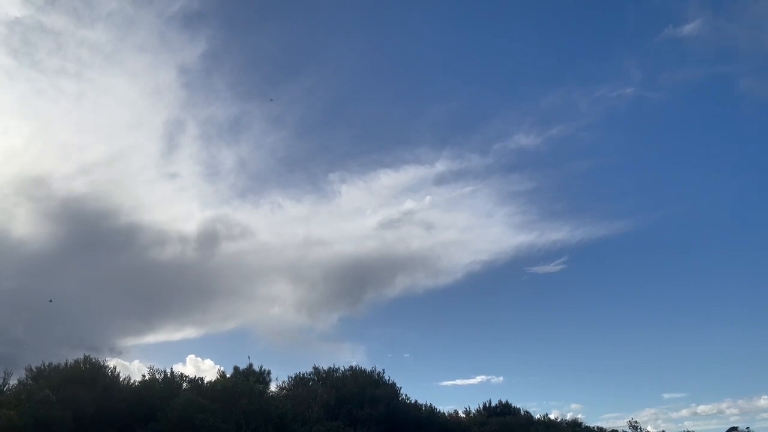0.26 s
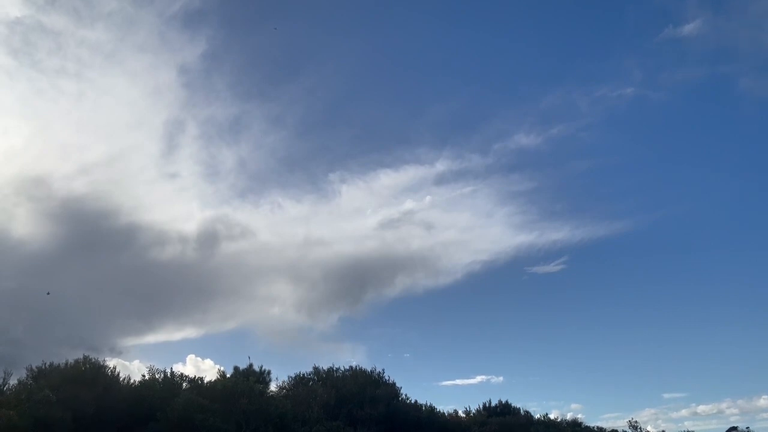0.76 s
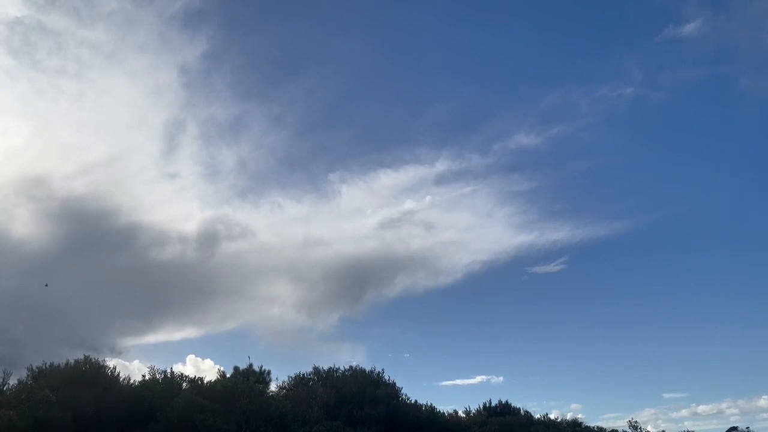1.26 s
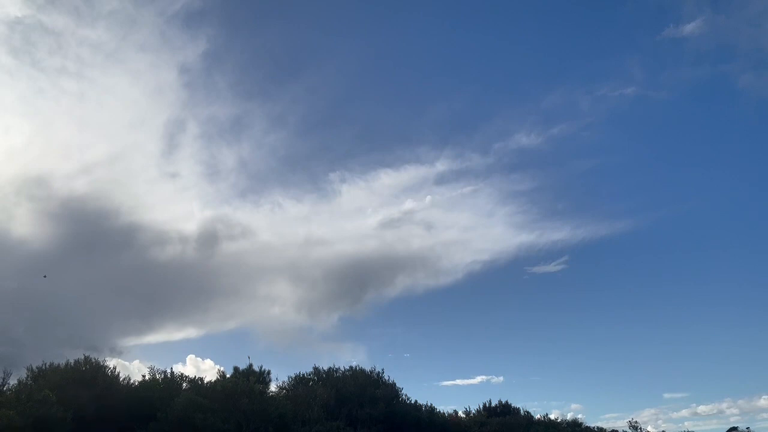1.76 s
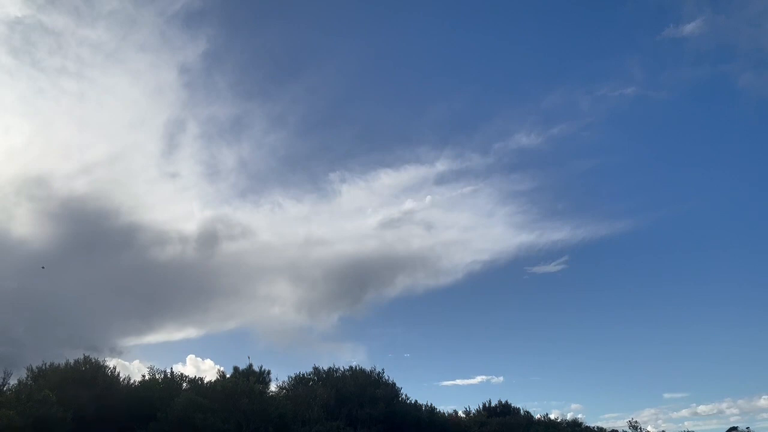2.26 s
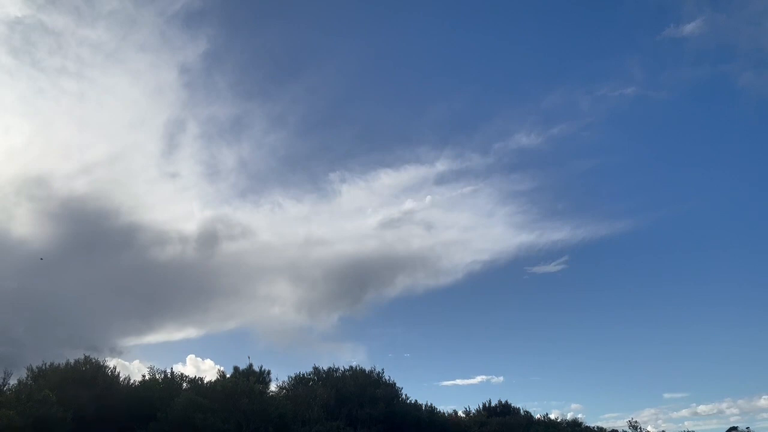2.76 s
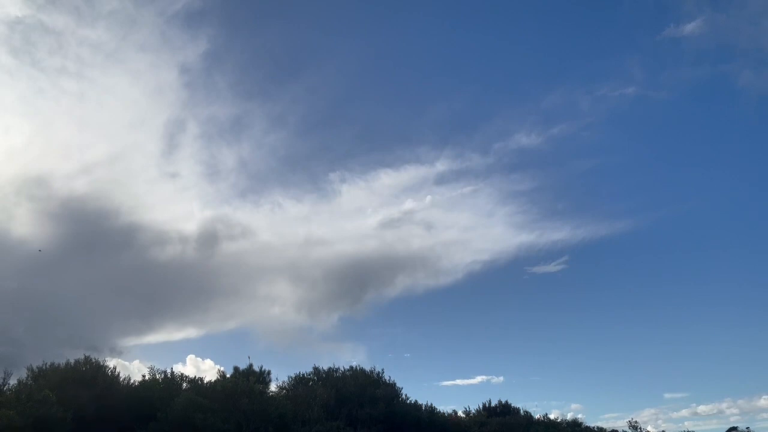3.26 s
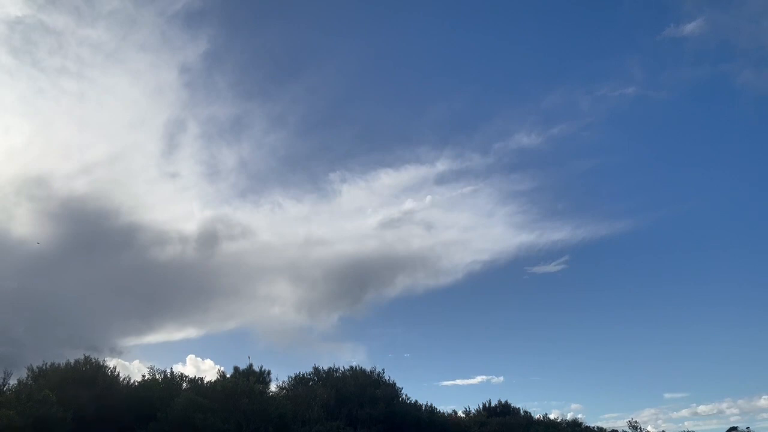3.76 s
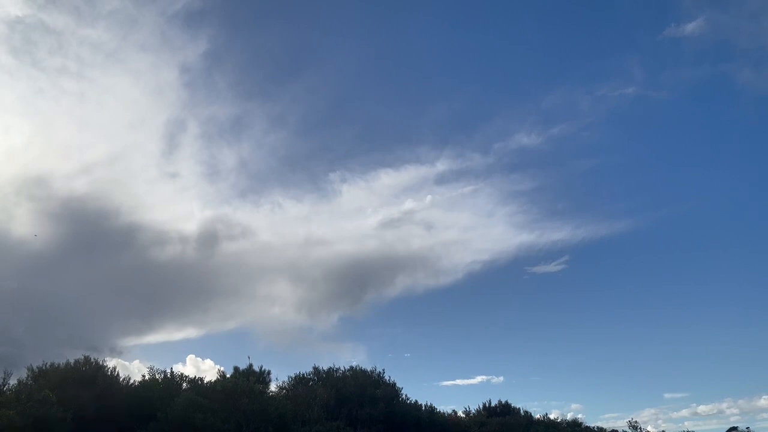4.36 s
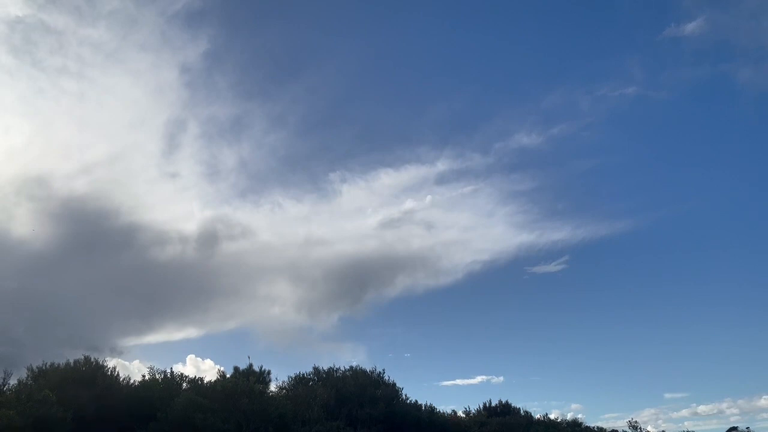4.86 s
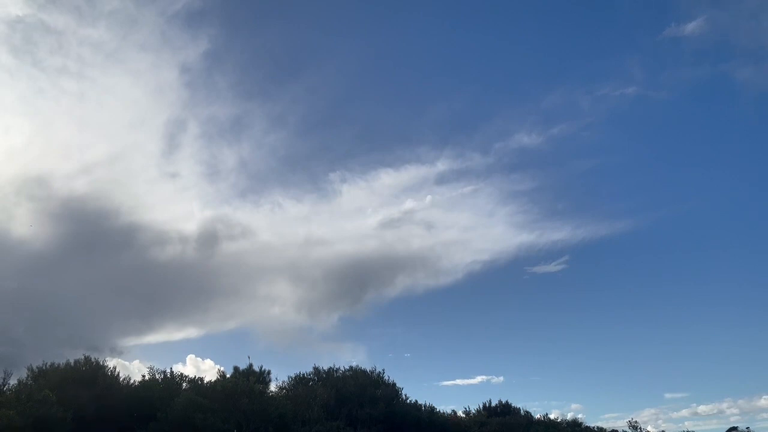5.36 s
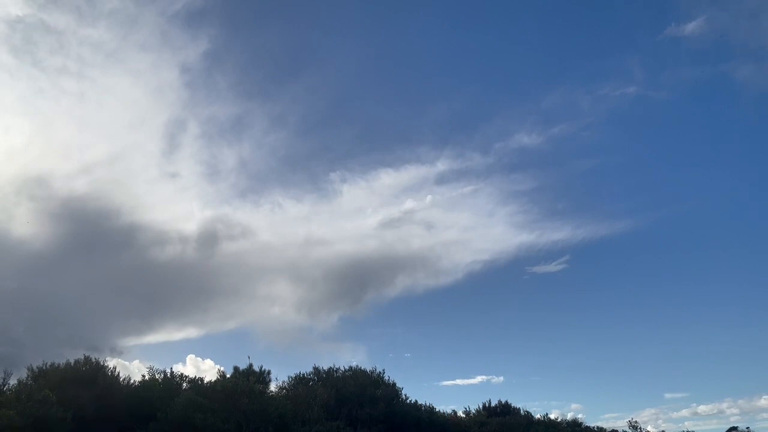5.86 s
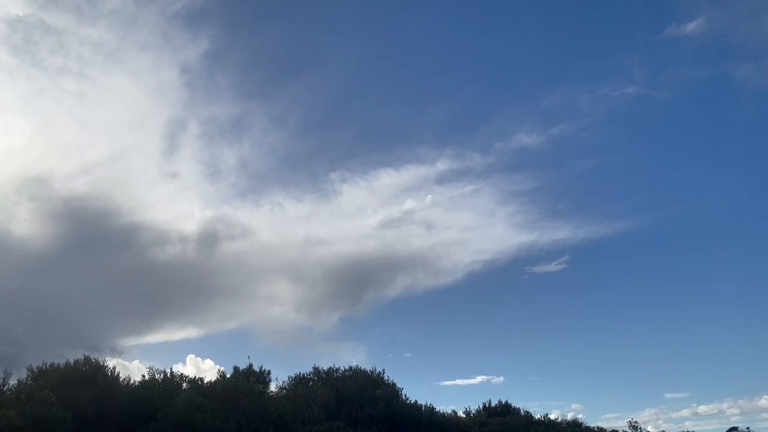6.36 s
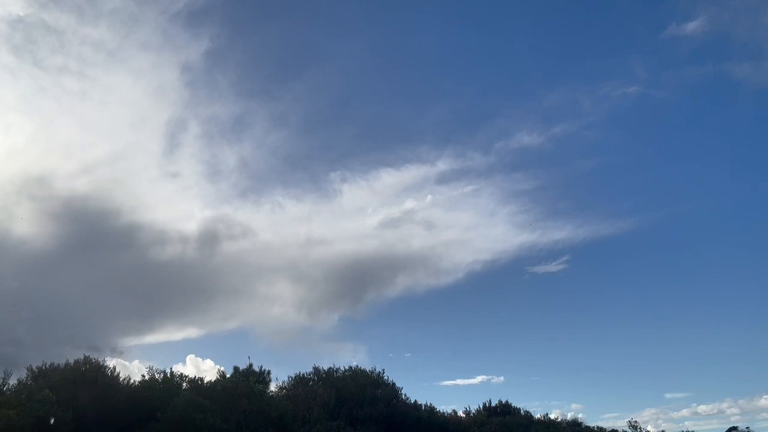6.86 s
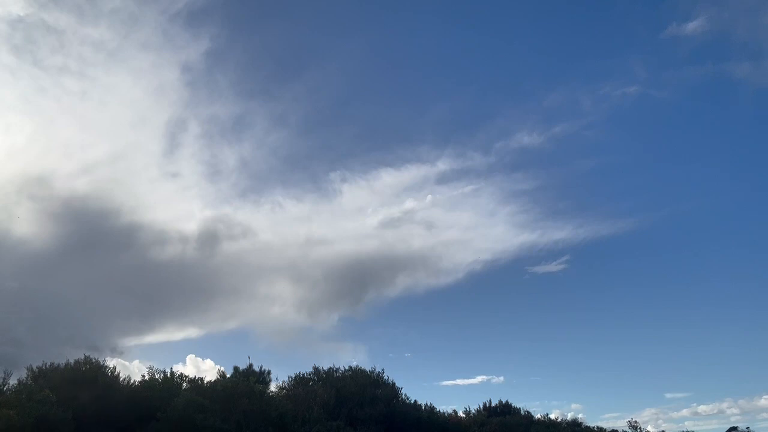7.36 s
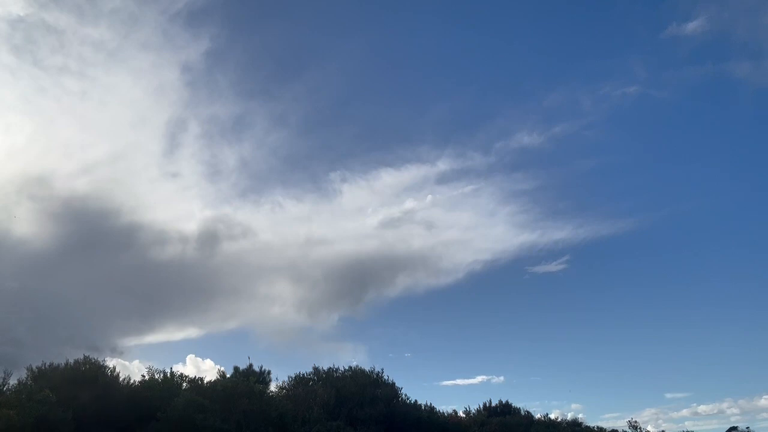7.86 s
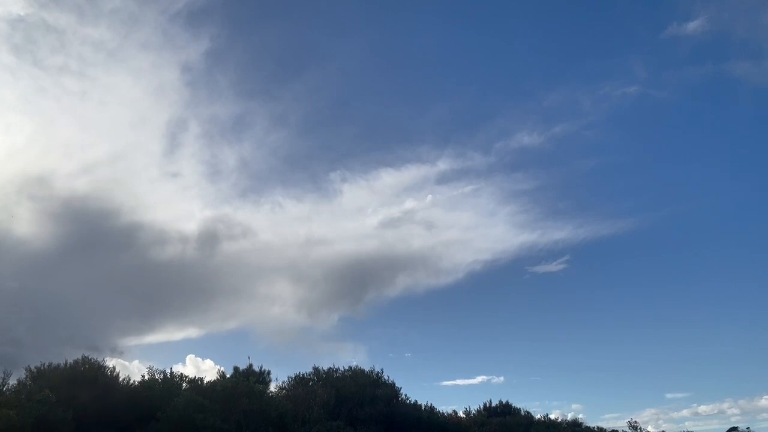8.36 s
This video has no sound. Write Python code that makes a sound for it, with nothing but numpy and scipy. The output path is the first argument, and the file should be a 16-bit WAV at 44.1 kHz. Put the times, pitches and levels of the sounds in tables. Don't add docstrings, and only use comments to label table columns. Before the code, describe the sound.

Open countryside, a jet far off in the sky, heard slightly left through a small camera's close stereo microphones. At 0 s a moderately loud, deep turbulent roar is already under way, with a few dry crackles; it lifts briefly around 0.6 s, then recedes, fluttering irregularly as the air shifts. Brief brighter patches come near 1.6 and 2 s. From 2.5 to 4 s it sinks into a soft, dull rumble, quietest about 3.8 s, with faint hiss. Tiny high chirps at 1.4 and 4.2 s are almost buried. From 4.5 s the roar swells again, thickening by 6 s with rasp and scattered crackle, and is powerful by 7 s. Around 7.8-8.1 s it is harshest and brightest, a tearing burst of sharp, dense pops over heavy rumble. It then dulls, still loud and rumbling, easing slightly until 8.6 s. Short ground and wall reflections make it faintly hollow.

```python
import sys
import numpy as np
from scipy import signal
from scipy.fft import rfft, irfft, next_fast_len
from scipy.io import wavfile
from scipy.ndimage import uniform_filter1d, map_coordinates

SR = 44100
rng = np.random.default_rng(int(sys.argv[2]) if len(sys.argv) > 2 else 0)


def ratio_of_db(decibels):
    return 10 ** (np.asarray(decibels, float) / 20)


def store_wav(level_fs):
    pcm = np.round(np.clip(np.atleast_2d(level_fs), -1, 1) * 32767)
    wavfile.write(sys.argv[1], SR, pcm.T.astype(np.int16))


N = 380132

BAND_HZ = [110, 400, 1150, 3800]
# f/Hz, density/dB per Hz
EXHAUST_COLOUR = [(24, -59.5), (38, -38.5), (50, -25.5), (75, -19), (150, -21), (300, -25.5), (600, -27),
                  (1150, -32), (1550, -25.5), (2500, -27.5), (4000, -38.5), (6000, -42), (9000, -56),
                  (12500, -74), (15000, -83.5)]
# t/s, level/dB, side-on share over rear rumble/dB, clarity of the air/dB
FLIGHT_PATH = [(0.0, -20, -5, -31), (0.2, -19.5, -6.5, -35.5), (0.6, -18.5, -10.5, -38.5),
               (1.0, -21, -11.5, -37.5), (1.4, -23.5, -11, -42), (1.9, -26, -12, -38.5),
               (2.6, -27.5, -4.5, -38.5), (3.2, -32.5, -9, -43), (3.8, -36, -8.5, -42.5),
               (4.4, -34.5, -7, -39.5), (5.1, -27.5, -1, -36), (5.7, -23.5, -1.5, -35.5),
               (6.3, -17.5, -3.5, -33), (7.0, -14, -8.5, -39), (7.6, -14, -6.0, -32), (8.0, -15, -2.5, -29),
               (8.3, -13, -10, -34.5), (8.6, -16.5, -12.5, -41)]
# t/s, lift/dB, half length/s
STILL_POCKETS = [(0.076, 2, .08), (0.498, 1.5, .1), (0.916, 2.5, .08), (1.607, 5.5, .11), (2.013, 5, .07),
                 (2.367, 3.5, .06), (2.556, 2.5, .08), (5.228, 2, .1), (5.459, 2.5, .05), (6.005, 3.5, .05),
                 (6.41, -0.5, 0.077), (6.609, 2.5, 0.03), (6.77, 2.5, .05), (7.298, 1, 0.059),
                 (7.46, -1, 0.09), (7.858, 3, .06), (8.041, 4.5, 0.057), (8.154, 3.5, 0.046),
                 (8.287, 0, 0.044), (8.36, 0, 0.045)]
POCKET_REACH = [0.048, .15, .8, 1.05]
# t/s, f/Hz, gain/dB, half length/s
EDDIES = [(0.2, 740, -2.5, .3), (0.41, 200, 4, 0.73), (0.75, 400, -8.5, 0.34), (1.7, 380, 8, .2),
          (2.23, 1130, -3.5, 0.7), (3, 160, 1.5, 0.64), (4.8, 1300, 1, .2), (8.7, 230, -4.5, .2),
          (3.2, 1100, -4, 0.85), (4.1, 575, 4.5, 0.46), (4.6, 180, 4, 0.32), (5.3, 450, -4, 0.32),
          (5.4, 200, -9, 0.34), (3.6, 970, -2, 0.096), (6.5, 1100, -4, 0.3), (6.1, 520, 4.5, 0.16),
          (7.35, 380, 0, .12), (7.35, 150, -4, .2), (6.1, 150, 6, 0.17), (5.3, 330, 1.5, 0.14),
          (6.9, 280, -5, .08), (5.9, 940, 1, .3), (6.6, 880, 6, .3), (7.45, 900, 4.5, .15),
          (4.3, 290, -3, 0.42), (8.08, 13000, 13, .14), (0.044, 12500, -14, .15), (6.5, 900, -2.5, .3),
          (6.2, 900, -3.5, .2), (1.62, 2400, -3.5, .1), (3.7, 170, -3.5, .2), (0.72, 430, -4.5, 0.14),
          (0.083, 480, 3, 0.17), (6.55, 190, 4.5, 0.14), (7, 150, 3.5, .15), (1.62, 6500, -4, .1),
          (7.5, 700, 2, 0.13), (6.7, 190, 6.5, 0.086), (7.25, 220, -7, 0.18),
          (6.8, 440, 0.5, 0.14), (7.2, 1000, 3.5, .2), (8.4, 640, -2, 0.18), (7.75, 370, 4.5, 0.17),
                (7.95, 1130, 9, .18), (8.12, 3700, 9, 0.092), (8.06, 7500, 3.5, 0.11),
                (.08, 6500, -9.5, .1), (0.59, 7400, 6, .3), (4.2, 1000, 7, 0.18), (8.3, 920, 2.5, 0.21),
                (7.95, 970, -4, 0.18), (3.8, 1200, -5.5, 0.12), (3.21, 1200, 6, .15), (3.2, 750, 3, 0.28),
                (6.2, 150, 3, 0.17), (4.8, 170, -5.5, .2), (1.5, 2400, 2, .1), (1.8, 1600, 3, .1),
                (5.3, 460, 6.5, 0.13), (8.1, 320, 4, 0.18), (7.9, 870, -1.5, 0.57), (7.47, 3500, 9.5, 0.25),
                (2.3, 3200, 3.5, .4), (.2, 3900, 5, .3)]
# f/Hz, width/octaves, level/dB
COMB_RIDGES = [(880, .09, 2.5), (706, 0.13, -2.5), (1660, 0.063, 1)]
# f/Hz, level/dB
SCATTER = [(60, -42), (250, -29), (700, -8), (2000, -8), (6000, 1.5), (9000, -6.5)]
# f/Hz, level/dB
MIC_HISS = [(4000, -1), (7000, -1.5), (9000, -4.5), (10500, -5.5), (13000, -2.5), (16000, -8)]
# f/Hz, width/Hz, level/dB
FIXED_RINGS = [(3870, 590, 2), (1134, 174, 5.5), (2500, 1300, -1.5), (847, 72, 0.5), (547, 75, -2),
               (815, 410, -1), (184.4, 45, 4), (1478, 270, -3), (2200, 100, 3.5), (763, 50, -0.5),
               (1520, 150, -1.5), (1740, 60, -1)]
# t/s, peak/dB, sharpness/dB
STRONG_FRONTS = [(0.0368, -26.5, -29.5), (0.0982, -27.5, -19.5), (0.1095, -29, -29.5), (2.1405, -36, -37),
                 (2.1705, -38.5, -32), (2.3486, -39, -28), (5.451, -35.5, -36), (5.7224, -33, -33),
                 (5.9768, -31.5, -23), (5.9953, -29, -25), (6.1898, -26.5, -28.5), (6.341, -25.5, -25),
                 (6.3809, -24, -27.5), (6.5959, -24, -24.5), (6.6049, -22.5, -28), (6.76, -23, -26),
                 (6.996, -29.5, -41), (7.3058, -21.5, -31), (7.7672, -23, -21), (7.8271, -20.5, -29.5),
                 (7.8745, -20.5, -14.5), (7.9455, -25, -12), (7.9497, -17.5, -2), (7.9676, -16, -3),
                 (7.9872, -11.5, -22.5), (8.0102, -14, -17), (8.0377, -17.5, -17.5), (8.0626, -13, -20),
                 (8.108, -16, -22.5), (8.317, -21, -25.5), (8.3619, -24.5, -36)]
# t/s, peak/dB
APPROACH_CRACKLES = [(5.659, -48), (5.7503, -45), (6.108, -41), (6.1724, -34), (6.2756, -35), (6.322, -31),
                     (6.3974, -33), (6.417, -33), (6.5527, -37), (6.4378, -31), (6.4867, -38),
                     (6.5161, -38), (6.5435, -38), (6.7042, -38), (6.7426, -33), (6.8364, -33),
                     (6.8902, -42), (7.1511, -40), (7.1866, -37), (7.216, -34), (7.2609, -30),
                     (7.2898, -26), (7.3507, -28), (7.3906, -32), (7.4026, -31), (7.438, -30),
                     (7.4452, -29), (7.6801, -29), (7.7894, -26), (7.8143, -28), (8.2863, -33),
                     (7.5268, -30), (7.5877, -30), (7.7189, -29), (7.8436, -27), (7.9329, -21),
                     (8.1294, -24), (8.1678, -28), (8.1758, -25), (8.1928, -26), (8.2716, -33),
                     (8.3464, -31), (8.3858, -38), (8.3983, -32)]
# t/s, peak/dB
RECEDING_CRACKLES = [(0.2623, -46.5), (0.27, -39.5), (0.479, -50.5), (0.624, -44), (0.829, -52.5),
                     (0.913, -50.5), (0.9307, -47), (1.067, -50.5), (1.1513, -48.5), (1.513, -54),
                     (1.589, -43.5), (1.947, -50.5), (1.9735, -46.5), (2.007, -46.5), (2.0566, -46.5),
                     (2.1474, -45.5), (2.358, -50.5), (2.385, -49.5), (2.4855, -49), (2.529, -52),
                     (2.5663, -49.5), (2.6113, -50)]
# t/s, f/Hz, peak/dB
CHIRPS = [
    (1.43, 7550, -85),
    (4.19, 7500, -90),
]

FIRST_ENDS_S, TURN_S = 4.37, 0.28


def unit(x):
    return x / np.sqrt(np.mean(x ** 2) + 1e-20)


def along(points, hz):
    f, value = np.transpose(points)
    return np.interp(np.log(hz + 1), np.log(f + 1), value)


def bell(hz, centre_hz, octaves):
    return np.exp(-(np.log2((hz + 1) / centre_hz) / octaves) ** 2)


def after(t, start_s):
    return 1 / (1 + np.exp((start_s - t) / TURN_S))


def wobble(rate):
    knots = rng.standard_normal(int(N * rate / SR) + 4)
    return map_coordinates(knots, [np.arange(N) * rate / SR])


def filtered(x, response):
    m = next_fast_len(N + SR // 4)
    hz = np.fft.rfftfreq(m, 1 / SR)
    return irfft(rfft(x, m) * response(hz), m)[..., :N]


def delayed(x, ms):
    return map_coordinates(x, [np.arange(N) - ms * SR / 1000], mode="nearest")


def band_levels(t):
    s, *columns = np.transpose(FLIGHT_PATH)
    level, side, clarity = [np.interp(t, s, column) for column in columns]
    roar = 1.73 + side
    rasp = 2.5 + 0.16 * side + 0.38 * clarity - 0.32 * (level + 22.0)
    rasp -= 1.5 * (1 - after(t, FIRST_ENDS_S))
    hiss = -2 + clarity
    lift = sum(db * np.exp(-((t - s) / half) ** 2) for s, db, half in STILL_POCKETS)
    return level + np.array([0 * t, roar, rasp, hiss]) + np.outer(POCKET_REACH, lift)


def turbulence(crackle_db, per_second, spread_db, gust_db):
    hiss_db = band_levels(np.arange(N) / SR)[-1]
    near = np.clip((hiss_db + 89.5) / 20, 0, 1)
    gusts = 0.41 * wobble(15) + 0.73 * wobble(45)
    bunching = ratio_of_db(gust_db * (1.76 + 0.31 * near) * gusts)
    sizes = ratio_of_db(spread_db * np.minimum(rng.exponential(size=N), 3))
    impulses = sizes * (rng.random(N) < per_second / SR)
    fronts = filtered(unit(impulses), lambda hz: 1j + 0 * hz)
    fine = bunching * (rng.standard_normal(N) + ratio_of_db(crackle_db) * near * fronts)
    fine_share = lambda hz: hz ** 4 / (hz ** 4 + 2200 ** 4)
    smooth = filtered(rng.standard_normal(N), lambda hz: np.sqrt(1 - fine_share(hz)))
    return smooth + filtered(unit(fine), lambda hz: np.sqrt(fine_share(hz)))


def through_air(x, patchy_db, thinning):
    hz, t, z = signal.stft(x, SR, nperseg=512)
    shimmer = [db * np.interp(t, np.arange(N) / SR, wobble(5)) for db in (.6, .6, .6, .5)]
    band_numbers = np.arange(len(BAND_HZ))
    place = np.interp(np.log(hz + 1), np.log(BAND_HZ), band_numbers)
    blend = np.maximum(1 - abs(place[:, None] - band_numbers), 0)
    gain_db = blend @ (band_levels(t) + shimmer)

    crispness_db = band_levels(t)[-1] + 41.5 + 9.5 * np.exp(-t / 1.6)
    gain_db += thinning * np.clip(hz[:, None] / BAND_HZ[-1] - 1, 0, .7) * crispness_db
    gain_db -= 4 * np.outer(bell(hz, 1830, 1), after(t, FIRST_ENDS_S + 1.6))
    for s, centre, db, half in EDDIES:
        gain_db += db * np.outer(bell(hz, centre, 0.31), np.exp(-((t - s) / half) ** 2))
    for centre, octaves, db in COMB_RIDGES:
        gain_db += db * np.outer(bell(hz, centre, octaves), after(t, 4.1))

    patches = uniform_filter1d(rng.standard_normal(z.shape[1:]), size=5, axis=0)
    patches = uniform_filter1d(patches, size=14, axis=1)
    z = z * ratio_of_db(gain_db + patchy_db * unit(patches))
    passed = signal.istft(z, SR, nperseg=512)[1][:, :N]
    return np.sqrt(SR / 2) * filtered(passed, lambda hz: ratio_of_db(along(EXHAUST_COLOUR, hz)))


def scattered(pair):
    return filtered(pair, lambda hz: ratio_of_db(along(SCATTER, hz)))


def microphone(sound):
    t = np.arange(N) / SR
    bass = filtered(sound[0], lambda hz: 1 / (1 + (hz / 300) ** 4))
    loud = (abs(uniform_filter1d(bass ** 2, size=9000)) + 1e-9) ** 0.1
    hiss = filtered(rng.standard_normal((3, N)), lambda hz: ratio_of_db(along(MIC_HISS, hz)))
    flutter = ratio_of_db(11 + np.clip(t, .5, 2.5) * 1.8 * wobble(25))
    fade = 1 / (1 + np.exp((t - 2.3) / 0.45))
    haze = flutter * fade * filtered(hiss[2], lambda hz: hz < 9900)
    noise = hiss[0] + haze + 0.4 * hiss[1] * [[1], [-1]]
    squeezed = bass / (abs(uniform_filter1d(bass ** 2, size=4000)) + 1e-9) ** 0.067
    clock = np.sin(2 * np.pi * 9600 * t)
    return ratio_of_db(-93) * loud * noise + ratio_of_db(-65) * squeezed * clock


def lesser_fronts(count):
    t = np.arange(0, N / SR, .005)
    hiss_db = band_levels(t)[-1]
    share = np.cumsum(np.clip(hiss_db + 67, 1e-3, 12))
    chance = rng.standard_normal((count, 2))
    s = np.interp((np.arange(count) + rng.random(count)) / count, share / share[-1], t)
    peak_db = np.interp(s, t, hiss_db) + 15 + 3 * np.clip(chance[:, 0], -2, 1.5)
    peak_db -= 2 * (s < 5.92)
    return np.c_[s, peak_db, -32 + 2.5 * chance[:, 1]]


def crackles():
    s, db = np.transpose(APPROACH_CRACKLES + RECEDING_CRACKLES)
    return np.c_[s, db + 4, -30.5 + 0.3 * (db - db.mean())]


def shocks(wake_db, t60):
    rows = np.vstack([STRONG_FRONTS, crackles(), lesser_fronts(count=130)])
    s, db, sharp_db = np.transpose(rows)[..., None]
    size = 1024
    offsets = np.arange(size) - size // 8
    hz, t = np.fft.rfftfreq(size, 1 / SR), offsets / SR
    wake = ratio_of_db(wake_db - 60 * t / t60) * (t > 0) * rng.standard_normal((len(s), size))
    arrivals = rfft(1. * (t == 0)) + rfft(wake) / (1 + (hz / 7000) ** 2)
    rounding_db = np.minimum(0.68 * sharp_db + 7.0, -2) * ((hz / 3500) ** 1.41 - 1)
    step = 1j * 3500 * hz / (hz ** 2 + 1200 ** 2)
    step = step * ratio_of_db(db + 17.5 + rounding_db) / (1 + (hz / 15500) ** 6)
    at = np.round((s + .001) * SR).astype(int) + offsets
    return np.bincount(np.clip(at, 0, N).ravel(), irfft(arrivals * step).ravel(), N + 1)[:N]


def ports(direct):
    t = np.arange(N) / SR
    port_ms = 0.27 - 0.06 * np.exp(-t / 3.6)
    ground_ms = 2.26 + 0.017 * t
    ground_db = -6 + 1.1 * wobble(1.3)
    bounce = delayed(direct, ground_ms + 0.088 * wobble(2.5))
    ground = ratio_of_db(ground_db) * filtered(bounce, lambda hz: 1 / (1 + (hz / 3800) ** 2))

    wall_band = lambda hz: hz ** 4 / (hz ** 4 + 380 ** 4) / (1 + (hz / 1700) ** 2)
    wall = -filtered(direct, lambda hz: np.exp(-2j * np.pi * hz * 0.004875) * wall_band(hz))
    left = direct + ground - ratio_of_db(-11.5) * wall

    shade = lambda hz: 1 - 0.6 * 1j * hz * 1050 / (780 ** 2 - hz ** 2 + 1j * hz * 1050)
    right = filtered(delayed(direct + ground, port_ms), shade) + ratio_of_db(-12.5) * delayed(wall, port_ms)
    short = lambda hz: 1 / (1 + (6400 / (hz + 1)) ** 30)
    around = filtered(left, lambda hz: short(hz) * np.exp(2j * np.pi * (hz - 7950) * .000178))
    right = filtered(right, lambda hz: 1 - short(hz)) + around
    return np.array([left, ratio_of_db(-1.0) * right])


def bird():
    t = np.arange(N) / SR
    song = np.zeros(N)
    for s, hz, db in CHIRPS:
        u = t - s
        tremble = 2.5 * np.sin(2 * np.pi * 85 * u)
        tone = np.sin(2 * np.pi * hz * (u - .15 * u ** 2) + tremble)
        song += ratio_of_db(db) * np.exp(-(u / .03) ** 2) * tone
    return song


def scene():
    direct = turbulence(crackle_db=2.5, per_second=600, spread_db=4.5, gust_db=1.5)
    sources = np.vstack([direct, rng.standard_normal((2, N))])
    roar = through_air(sources, patchy_db=1.0, thinning=1.9)
    fronts = shocks(wake_db=-21, t60=0.045)
    return ports(roar[0] + fronts) + scattered(roar[1:]) + bird()


def band_limit(x):
    return signal.sosfilt(signal.butter(12, 15900, fs=SR, output="sos"), x)


def record(dry):
    cut = filtered(dry, lambda hz: np.array([hz / (hz - 17j), hz / (hz - 12j)]))
    ring_db = lambda hz: sum(db / (1 + (2 * (hz - c) / w) ** 2) for c, w, db in FIXED_RINGS)
    cut = filtered(cut, lambda hz: ratio_of_db(ring_db(hz)))
    cut = cut + microphone(cut)
    held = cut / (1 + abs(cut) ** 6) ** (1 / 6)
    return band_limit(held)


dry = scene()
out = record(dry)
store_wav(out)
```